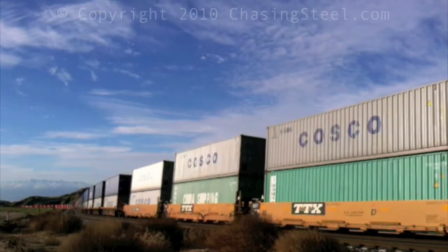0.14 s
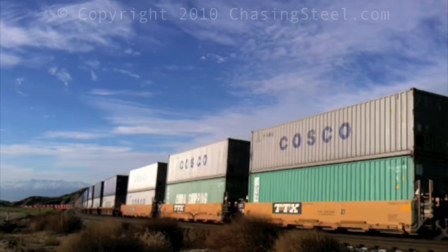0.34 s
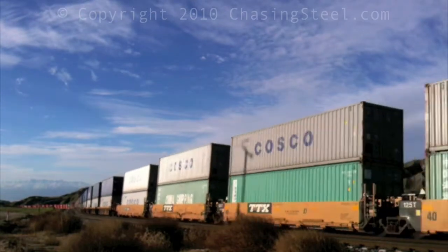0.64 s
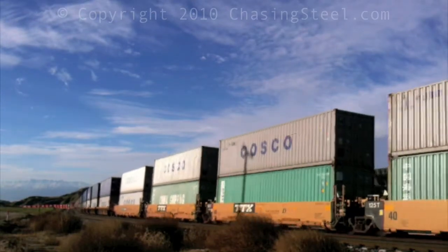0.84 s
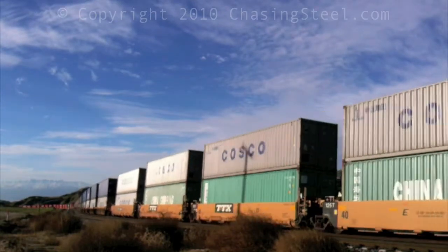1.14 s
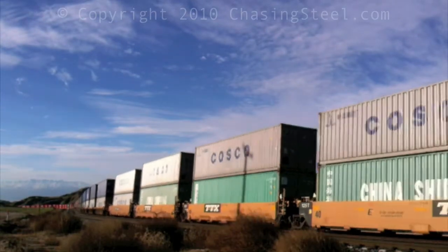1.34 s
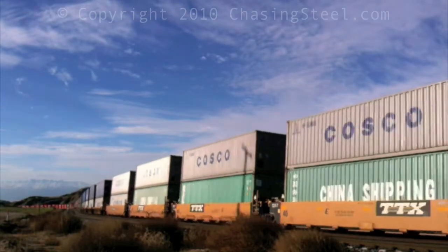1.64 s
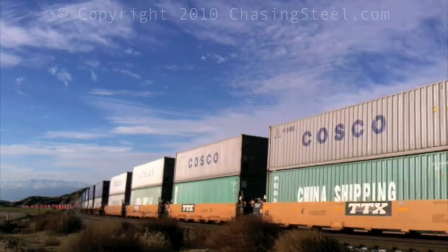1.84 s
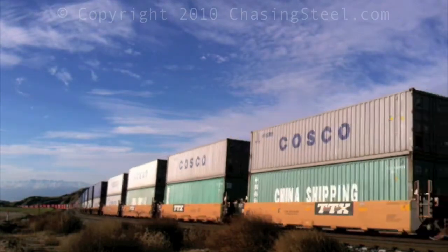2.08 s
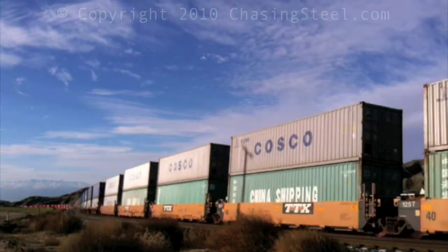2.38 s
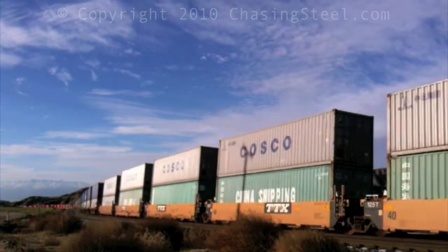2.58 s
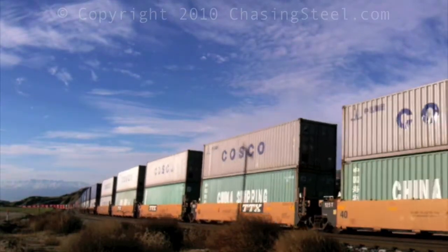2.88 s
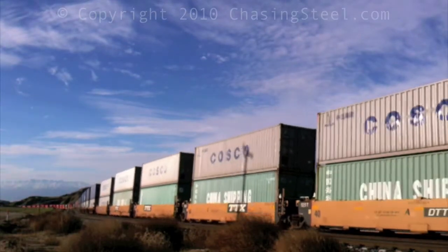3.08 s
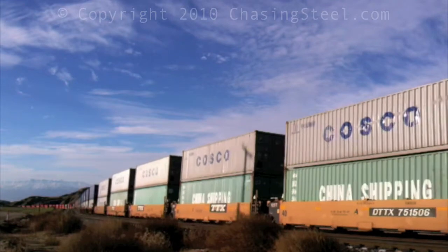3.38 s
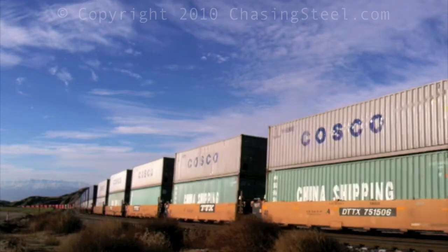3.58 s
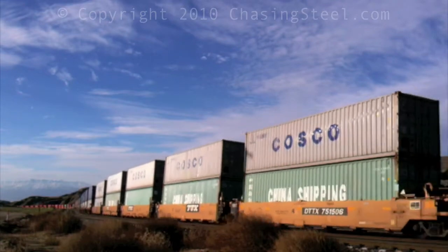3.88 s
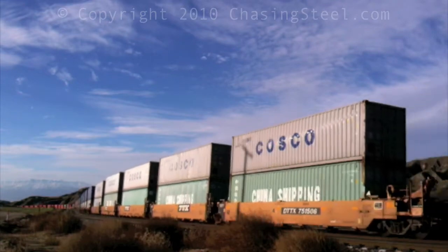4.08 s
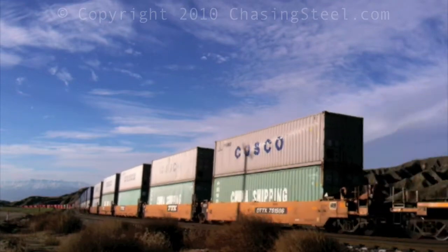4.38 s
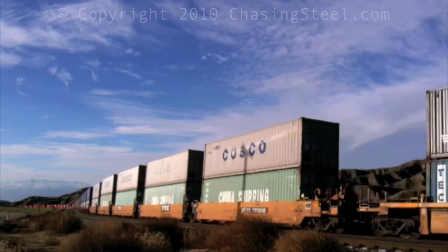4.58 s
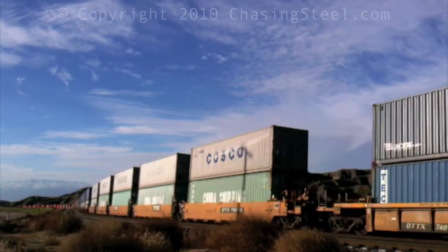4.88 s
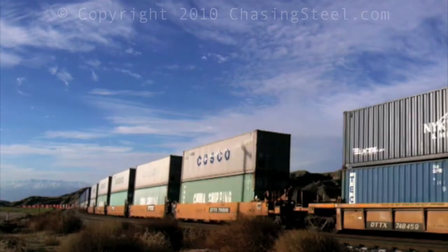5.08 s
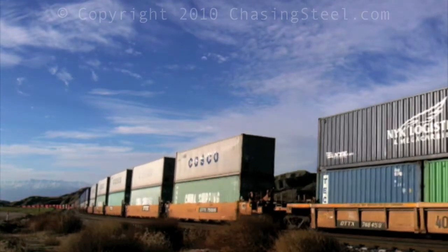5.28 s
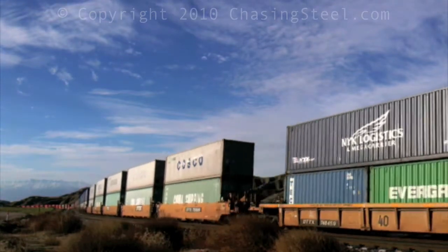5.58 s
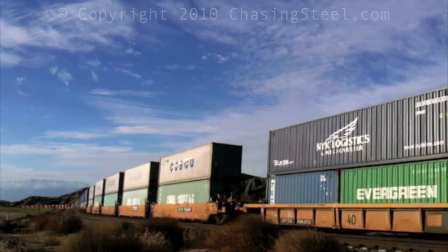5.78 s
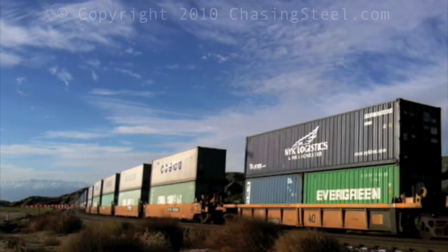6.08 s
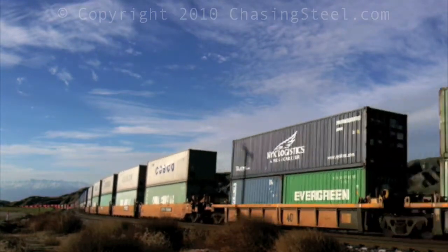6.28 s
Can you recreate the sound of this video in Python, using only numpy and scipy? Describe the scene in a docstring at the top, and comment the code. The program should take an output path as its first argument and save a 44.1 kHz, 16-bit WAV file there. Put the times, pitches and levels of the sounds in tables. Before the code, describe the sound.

Beside an open-air track, a loaded container train is already rolling past at 0 s and continues to the end at about 6.4 s. A steady deep rumble with a soft hollow boom and a grainy rail roar swells only slightly. From 0 to 2 s, a wheel squeaks with short, thin, fluttering upward whistles, roughly every 0.3 s, over faint scraping and distant very high whines. The squeaks space out and weaken until about 3.7 s. Meanwhile another wheel's pulsing scrape grows, with brief ringing metal notes from about 2 s and a very high squeal creeping in. From 3.7 to 5.1 s it is closest: sharp, piercing bursts, bright ringing and harsh rubbing, strongest near 4.5 to 4.7 s. Afterwards the pitches sit lower, and scraping, scattered pings and wavering squeals continue more weakly over the rumble. The microphone stays fixed, central and fairly close.

```python
"""A steady rumble and the scrape of a wheel open the scene: a freight train rolls past the track side. Shaped
noise makes the rumble, the boom and the roar of the rails. One wheel scrapes the rail once a turn: noise rings
in its modes, some sing out as clean tones, and a very high tone squeals, faintly at first. All these sink in
pitch as it passes. Another wheel, earlier in the train, squeaks about once a turn; wheels further off whine
faintly."""
import sys
import numpy as np
from scipy import signal
from scipy.io import wavfile
from scipy.ndimage import uniform_filter1d

SR = 44100
rng = np.random.default_rng(int(sys.argv[2]) if len(sys.argv) > 2 else 0)


def transcribe(u):
    """Save the signal u as a 16-bit wav file named by the first command-line argument.

    u: samples, shape (n,) or (channels, n), limited to [-1, 1]; the rate is SR.
    q: integer samples, one column per channel.
    """
    v = np.clip(np.atleast_2d(u).T, -1, 1)
    q = np.round(v * 32767).astype(np.int16)
    wavfile.write(sys.argv[1], SR, q)


N = 283563  # length of the scene in samples


def gain_of(db):
    """Turn decibels into a plain multiplier."""
    return 10 ** (np.asarray(db) / 20)


def evened(x):
    """Scale a signal to an rms of 1."""
    return x / np.sqrt(np.mean(x ** 2) + 1e-20)


def read(points, hz):
    """Read a curve of values against frequency, joined by straight lines on a log scale."""
    f, value = np.transpose(points)
    return np.interp(np.log(hz + 1), np.log(f + 1), value)


def follow(rows, t):
    """Read every column of a table at the times t; its first column is seconds."""
    s, *columns = np.transpose(rows)
    return [np.interp(t, s, c) for c in columns]


def add(mix, s, sound):
    """Mix in a sound that starts at s seconds."""
    part = mix[round(s * SR):][:len(sound)]
    part += sound[:len(part)]


def wander(count, size):
    """Smooth chance of rms 1, changing over about size samples."""
    smooth = uniform_filter1d(rng.standard_normal(count), size)
    return evened(uniform_filter1d(smooth, size))


def noise(power, patchy_db, size):
    """Random short-time spectra; power(hz, t) is the field, broken by drifting patches."""
    hop = size // 4
    hz = np.fft.rfftfreq(size, 1 / SR)[:, None]
    t = np.arange(N // hop + 5) * hop / SR
    a, b, patches = rng.standard_normal((len(t), len(hz), 3)).T
    patches = uniform_filter1d(np.ascontiguousarray(patches), size=8, axis=0)  # across frequency
    patches = evened(uniform_filter1d(patches, size=12, axis=1))  # across time
    spectra = (a + 1j * b) * np.sqrt(power(hz, t)) * gain_of(patchy_db * patches)
    return signal.istft(spectra, nperseg=size, noverlap=size - hop)[1][:N]


def press(t, start, length, rise, fall):
    """A soft-edged window of height 1: comes on at start, lets go after length."""
    coming_on = 1 + np.tanh((t - start) / rise)
    letting_go = 1 - np.tanh((t - start - length) / fall)
    return coming_on * letting_go / 4


SPEED, DISTANCE, NEAREST = 8.48, 12.5, 4.795  # m/s, m from the track, s when the wheel is closest


def doppler(t):
    """Pitch factor of the scraping wheel: above 1 as it comes, below 1 as it goes."""
    along = SPEED * (t - NEAREST)
    return 1 - SPEED / 343 * along / np.hypot(along, DISTANCE)  # 343 m/s is the speed of sound


# Flange against rail between the hard rubs: a light scrape that wavers and grows stronger
# as the wheel nears. Each row: time in seconds, scrape level in dB, treble tilt in dB.
LIGHT_CONTACT = [(0, -44.5, 3), (.27, -46.5, 1), (.85, -45, 0), (.97, -44.5, -14), (1.15, -48, -2),
                 (1.3, -46, -8.5), (1.5, -40, -8.5), (1.63, -45.5, -10.5), (1.66, -47, 1),
                 (1.7, -38.5, -0.5), (2.3, -40, 1), (3, -35.5, -1), (3.7, -36, 0.5), (3.9, -32, -0.5),
                 (4.55, -29, 1.5), (4.64, -34.5, 0), (4.72, -33.5, 3.5), (5, -31, 0.5), (5.5, -33, 0),
                 (5.65, -37.5, 2), (6.05, -37, 2), (6.43, -38.5, 6.5)]
# Hard rubs, about once a turn of the wheel and sometimes between.
# Each row: start in seconds, length in seconds, level in dB.
HARD_RUBS = [(.07, 0.15, -44.5), (0.373, 0.069, -42.5), (0.45, 0.12, -39.5), (0.69, 0.068, -40),
             (0.775, 0.15, -38.5), (1.025, 0.059, -38), (1.155, 0.1, -40), (1.388, 0.2, -47),
             (1.753, 0.089, -37.5), (1.84, 0.08, -37), (2.095, .15, -35.5), (2.313, 0.1, -34.5),
             (2.451, 0.077, -36), (2.77, 0.093, -33), (3.092, 0.1, -33.5), (3.318, 0.086, -34.5),
             (3.427, 0.096, -29.5), (3.792, 0.13, -32), (4.092, 0.17, -30.5), (4.41, 0.19, -29.5),
             (4.665, 0.051, -33), (4.757, .17, -26), (4.944, 0.058, -29), (5.017, 0.037, -29),
             (5.138, 0.076, -28.5), (5.254, 0.048, -31), (5.304, .13, -32.5), (5.492, 0.044, -29),
             (5.682, 0.061, -32.5), (5.783, 0.15, -28.5), (6.118, 0.18, -28.5)]
RUB_RISE_S, RUB_FALL_S = 0.014, 0.02
DULLING = 0.5  # the treble tilt drops this many dB for each dB of rub


def contact(t):
    """Level and treble tilt of the scrape: light contact plus the hard rubs."""
    light_db, treble_db = follow(LIGHT_CONTACT, t)
    hard = sum(gain_of(db) * press(t, s, length, RUB_RISE_S, RUB_FALL_S) for s, length, db in HARD_RUBS)
    rub_db = 10 * np.log10(gain_of(2 * light_db) + hard ** 2)
    return rub_db, treble_db - DULLING * (rub_db - light_db)


SCATTER_HZ = 8  # rms drift of a mode's pitch


def mode(hz, centre_hz, width, db):
    """Power of one mode, whose strength flickers and whose pitch shifts as the contact wanders."""
    strength = gain_of(2 * (db + 1.3 * wander(len(centre_hz), size=5)))
    away = hz - centre_hz - SCATTER_HZ * wander(len(centre_hz), size=3)
    return strength / (1 + (2 * away / width) ** 2) ** 0.96


# Broad part of the scrape.
# Each row: frequency in Hz, relative strength in dB per Hz.
HISS_CURVE = [(700, -9), (1500, -16), (2120, -6), (2600, 2), (2860, -7), (3300, 1), (3560, -3), (3950, 0),
              (6000, 2), (9000, 4.5), (12000, -1), (12700, 8), (13100, -11), (14500, 0.5), (16000, -20)]
# Modes of the wheel at rest, the pitches it rings at.
# Each row: frequency in Hz, width in Hz, relative level in dB.
WHEEL_MODES = [(1513, 180, -22.5), (1897, 39, -17), (2296, 30, -18), (2454, 51, -17), (2973, 19, -14.5),
               (3120, 52, -16), (3739, 39, -12), (3860, 140, -19), (4030, 16, -13), (4390, 80, -16.5),
               (4596, 64, -12), (5426, 270, -17), (6295, 89, -12.5), (7116, 61, -7.5), (8010, 220, -12),
               (8670, 53, -14.5), (8860, 45, -10), (9410, 120, -16.5), (9850, 36, -12), (10250, 77, -18),
               (10630, 130, -15), (11240, 130, -24), (11550, 170, -16)]
# How far the modes are raised over the hiss.
# Each row: time in seconds, boost in dB.
RING_BOOST = [(0, 21), (1.6, 9), (1.8, 22), (3, 23.5), (4.5, 29.5), (6.43, 30)]
BAND_HZ = [3000, 4900]  # the scrape level is set in this band


def scrape():
    """Friction noise, broad and through the wheel's modes, whose share of the sound changes over time."""
    def power(hz, t):
        rub_db, bright_db = contact(t)
        tiny_lift_db = 0.029 * (rub_db - uniform_filter1d(rub_db, size=60))
        ring_db = follow(RING_BOOST, t)[0] + tiny_lift_db
        modes = sum(mode(hz, f * doppler(t), width, db) for f, width, db in WHEEL_MODES)
        field = gain_of(2 * read(HISS_CURVE, hz)) + gain_of(2 * ring_db) * modes
        in_band = (hz[:, 0] > BAND_HZ[0]) & (hz[:, 0] < BAND_HZ[1])
        field = field / uniform_filter1d(field[in_band].sum(0), size=3)  # even out the band level
        # the tilt starts at 4 kHz and reaches its full dB value at 10.4 kHz
        tilt_db = bright_db * np.clip(np.log2(hz / 4000 + 1e-9) / np.log2(2.6), 0, 1.3)
        return field * gain_of(2 * tilt_db)

    sound = noise(power, patchy_db=1.4, size=2048)
    band = signal.sosfilt(signal.butter(4, BAND_HZ, "band", fs=SR, output="sos"), sound)
    level_db = np.repeat(contact(np.arange(0, N, 32) / SR)[0], 32)[:N]  # worked out every 32 samples
    return gain_of(level_db) * sound / band.std()


# Moments when one mode sings out.
# Each row: middle in seconds, length in seconds, pitch at the middle in Hz, peak level in dB.
SINGING_MOMENTS = [(0.784, 0.11, 7140, -37), (1.878, 0.18, 3170, -33), (1.908, 0.1, 1990, -40),
                   (2.116, 0.1, 9800, -36), (2.382, 0.1, 8040, -23), (2.383, 0.09, 10136, -32),
                   (2.387, 0.054, 7030, -29), (2.108, 0.066, 1980, -36), (2.762, 0.15, 1940, -36.5),
                   (2.82, 0.13, 3900, -39), (2.819, 0.094, 8161, -30), (3.096, 0.16, 7240, -36),
                   (3.11, 0.074, 3870, -36), (3.16, .2, 3150, -39.5), (3.48, 0.055, 4170, -29),
                   (3.504, 0.047, 7300, -29), (3.835, 0.11, 7200, -28), (3.876, 0.064, 8000, -29),
                   (4.186, 0.037, 8882, -22), (4.231, 0.3, 7200, -26), (4.246, 0.089, 5512, -29),
                   (4.46, 0.26, 3770, -32), (4.45, 0.078, 2450, -32), (4.552, .12, 4610, -28),
                   (3.892, 0.13, 4600, -32), (4.15, 0.16, 3790, -33), (4.428, 0.045, 1985, -28.5),
                   (4.159, 0.19, 3110, -31), (4.487, 0.14, 6250, -29), (4.534, 0.14, 7186, -16.5),
                   (4.68, 0.088, 3840, -34), (4.82, 0.13, 9776, -21), (4.806, 0.087, 3070, -28),
                   (4.821, 0.094, 8021, -27), (4.822, 0.066, 7062, -23), (4.855, 0.18, 8882, -24),
                   (4.86, 0.16, 4100, -24), (3.87, .12, 5500, -33), (4.861, 0.05, 5355, -28),
                   (4.88, 0.16, 3820, -29), (5.05, 0.07, 7080, -29), (5.063, 0.069, 9800, -25),
                   (5.219, 0.19, 7120, -30), (5.205, .06, 2280, -34), (5.294, 0.072, 2260, -32),
                   (5.3, 0.086, 8731, -29), (5.373, 0.084, 7140, -25), (5.385, 0.081, 7918, -28),
                   (5.513, 0.062, 7060, -26), (5.692, 0.076, 7080, -33), (5.85, 0.08, 7881, -23),
                   (6.02, 0.15, 6860, -35), (6.084, 0.085, 7760, -28), (5.542, 0.1, 3760, -33),
                   (5.072, .16, 3780, -33), (5.33, .2, 4500, -35), (6.13, .08, 4480, -34),
                   (6.203, 0.087, 3640, -33), (6.106, 0.065, 1890, -34), (6.152, .06, 3060, -31),
                   (6.254, 0.24, 3050, -37), (6.245, 0.062, 1910, -30), (6.312, .08, 1890, -30.5),
                   (6.24, 0.09, 7014, -27)]


def sings():
    """A mode locks into a clean tone that swells, sinks with the motion and dies."""
    out = np.zeros(N)
    for s, length, hz, db in SINGING_MOMENTS:
        t = s + np.arange(-length, length, 1 / SR)
        turns = np.cumsum(hz * doppler(t) / doppler(s)) / SR + rng.random()
        swell = np.exp(-.5 * ((t - s) / (0.28 * length)) ** 2)
        loose = np.clip((7000 - hz) / 3000, 0, 1)  # low modes lock less firmly and stay raspy
        rasp = 1 - .25 * loose + (.25 + .25 * loose) * wander(len(t), size=270)
        tone = np.sin(2 * np.pi * turns)
        add(out, t[0], np.sqrt(2) * gain_of(db) * swell * rasp * tone)
    return out


# The lasting part of the high squeal.
# Each row: time in seconds, level in dB.
LASTING_SQUEAL = [(2.0, -44), (2.22, -38), (3.1, -32.5), (3.8, -28.5), (4.2, -24), (4.55, -18), (4.8, -27),
                  (5.2, -20.5), (5.75, -27.5), (6, -23.5), (6.17, -29), (6.35, -36), (6.43, -28)]
# Bursts of the squeal as the flange bites.
# Each row: start in seconds, length in seconds, level in dB.
FLANGE_BITES = [(3.11, .03, -33), (3.556, .05, -30), (3.724, 0.037, -17), (3.902, 0.067, -18),
                (4.008, .11, -18), (4.21, 0.078, -27), (4.287, 0.032, -13), (4.357, 0.04, -23),
                (4.46, 0.023, -18), (4.504, 0.027, -11.5), (4.55, 0.027, -13), (4.589, 0.049, -13),
                (4.631, 0.055, -7.5), (4.715, 0.034, -19), (4.825, 0.013, -12), (4.885, 0.02, -26),
                (4.994, 0.039, -24), (5.072, 0.053, -13.5), (5.14, .07, -28), (5.236, 0.054, -17),
                (5.335, 0.042, -20), (5.43, 0.14, -27.5), (5.632, 0.04, -26), (5.7, 0.02, -17),
                (5.8, 0.055, -30), (6.044, .06, -29)]
BITE_RISE_S, BITE_FALL_S = 0.0091, 0.013
SQUEAL_HZ = 12486  # before the pitch factor of the passing wheel


def squeal():
    """A nearly pure tone with a fluttering level and a thin noisy skirt; bites add to its lasting level."""
    t = np.arange(N) / SR
    turns = np.cumsum(SQUEAL_HZ * doppler(t) + 4.6 * wander(N, size=500)) / SR
    flutter = gain_of(.8 * wander(N, size=400))
    skirt = .09 * wander(N, size=200)
    fade = np.clip((t - LASTING_SQUEAL[0][0]) / 0.23, 0, 1)
    lasting = fade * gain_of(follow(LASTING_SQUEAL, t)[0]) * (1 + 0.38 * wander(N, size=180))
    bites = sum(gain_of(db) * press(t, s, length, BITE_RISE_S, BITE_FALL_S)
                for s, length, db in FLANGE_BITES)
    return np.sqrt(2) * (lasting + bites) * (flutter + skirt) * np.sin(2 * np.pi * turns)


# Overtones of the squeak.
# Each row: multiple of the pitch, relative level in dB.
SQUEAK_OVERTONES = [(2, -1), (3, -6)]
SQUEAK_RISE_S, SQUEAK_FALL_S = 0.014, 0.024
SQUEAK_JITTER_HZ, OVERTONE_FUZZ = 13, .75  # rms wobble of pitch in Hz, of overtone phase in radians
SQUEAK_FLUTTER, SQUEAK_HAZE = .65, .22  # shares of the whistle once it has worked loose
OVERTONE_FADE_DB = 95  # per second, for each step up the series
HOARSE_PER_DB, CLEAR_DB = .045, -23  # haze added for each dB that a squeak lies below CLEAR_DB


def squeak(start, length, db, first_hz, climb, sag_db, overtones_db):
    """Stick and slip near one mode: a thin gliding, fluttering whistle whose overtones fade first."""
    t = np.arange(-.06, length + .12, 1 / SR)  # room for the soft edges
    held = np.clip(t, 0, length)
    level = gain_of(db + sag_db * held) * press(t, 0, length, SQUEAK_RISE_S, SQUEAK_FALL_S)
    turns = np.cumsum(first_hz + climb * held + SQUEAK_JITTER_HZ * wander(len(t), size=300)) / SR
    tone = np.sin(2 * np.pi * turns)
    for k, k_db in SQUEAK_OVERTONES:
        strength = gain_of(overtones_db + k_db - OVERTONE_FADE_DB * (k - 1.5) * held)
        fuzz = OVERTONE_FUZZ * wander(len(t), size=170)
        tone = tone + strength * np.sin(2 * np.pi * k * turns + fuzz)
    loose = np.clip(held / 0.039, .3, 1)  # clean as it grips, rougher as it goes on
    flutter = 1 + SQUEAK_FLUTTER * loose * wander(len(t), size=220)
    # a raspy band around the whistle, hoarser in weak squeaks
    hoarse = SQUEAK_HAZE * loose + HOARSE_PER_DB * max(CLEAR_DB - db, 0)
    haze = hoarse * wander(len(t), size=110) * np.cos(2 * np.pi * turns)
    sound = np.sqrt(2) * level * (flutter * tone + haze)
    return max(start + t[0], 0), sound[t + start >= 0]


# The squeaking wheel: about one long squeak a turn, some with a brief lead-in; early on, short ones between.
# Each row: start in seconds, length in seconds, level in dB, first pitch in Hz, climb in Hz per second,
# level change in dB per second (negative sags), level of the overtones in dB.
WHEEL_SQUEAKS = [(.01, 0.041, -39, 2590, -300, -40, -20), (0.118, 0.058, -36, 2540, 0, 0, -2),
                 (0.151, 0.11, -25, 2577, 856, -43, -13), (0.337, 0.065, -33.5, 2620, -900, -17, -16),
                 (0.452, .15, -33, 2560, 652, 14, -8), (0.673, 0.037, -34, 2590, -300, -42, -20),
                 (0.787, .034, -31.5, 2566, 0, 100, -15), (0.818, .12, -23.5, 2560, 796, -21, -12),
                 (1.01, 0.038, -34, 2610, -700, -60, -20), (1.137, 0.16, -21.5, 2518, 697, -95, -9.5),
                 (1.475, 0.13, -22.5, 2505, 793, -49, -10.5), (1.693, 0.059, -30.5, 2540, -300, -40, -20),
                 (1.838, .15, -27, 2486, 772, -87, -14), (2.053, 0.023, -29, 2590, -300, -40, -22),
                 (2.172, 0.15, -29, 2480, 694, -27, -16), (2.39, 0.11, -37, 2560, -500, -40, -20),
                 (2.539, 0.17, -27, 2485, 902, -93, -14), (2.878, 0.099, -31, 2490, 770, -70, -18),
                 (3.247, 0.1, -34, 2490, 770, -25, -16), (3.6, 0.11, -39, 2500, 500, -30, -16)]


def squeaks():
    """The other wheel's squeaks, each a short stick-and-slip whistle set at its own time."""
    out = np.zeros(N)
    for row in WHEEL_SQUEAKS:
        add(out, *squeak(*row))
    return out


# Faint fuzzy whines, one list for each whine: first the high squeal heard faintly early on, then the whine of
# wheels further off. Each row: time in seconds, pitch in Hz, level in dB.
FAINT_WHINES = [
    [(0, 12805, -53), (.5, 12800, -52), (1, 12795, -54), (1.1, 12790, -70)],
    [(0, 12570, -55), (.7, 12550, -49), (.9, 12540, -66), (1.7, 12590, -62), (2.2, 12590, -45),
     (3, 12520, -44), (4, 12470, -39), (4.6, 12480, -42), (5.3, 12530, -38), (6, 12435, -39),
     (6.43, 12420, -40)],
]


def whines():
    """Narrow bands of noise: a tone times slow chance."""
    out = np.zeros(N)
    for rows in FAINT_WHINES:
        t = np.arange(rows[0][0], rows[-1][0], 1 / SR)
        hz, db = follow(rows, t)
        tone = np.sin(2 * np.pi * np.cumsum(hz) / SR)
        add(out, t[0], np.sqrt(2) * gain_of(db) * wander(len(t), size=450) * tone)
    return out


# The train's mass rolling.
# Each row: time in seconds, then levels in dB of the rumble, the boom of the hollow cars, the rails' roar.
ROLLING_LEVELS = [(0, -31, -33, -37.5), (.25, -30.5, -35, -40), (.5, -30.5, -36.5, -36.5),
                  (1, -30.5, -40, -39), (1.5, -30, -40, -38.5), (2, -29.5, -39, -36),
                  (2.5, -29.5, -37.5, -37), (3, -28.5, -35.5, -35.5), (3.5, -28, -33, -34.5),
                  (3.9, -28, -35, -34.5), (4.2, -26.5, -30, -33), (4.5, -26.5, -35, -33.5),
                  (4.65, -27.5, -38, -35.5), (4.9, -27.5, -31, -34.5), (5.3, -27, -39, -34),
                  (5.7, -26, -34, -34.5), (6, -27, -44, -34.5), (6.43, -27, -32, -35)]
# Tone colour of the rumble and of the roar.
# Each row: frequency in Hz, relative strength in dB per Hz.
RUMBLE_CURVE = [(20, -56), (54, -53), (75, -14), (95, -9), (146, -1), (200, -2), (240, 2.5), (273, -2.5),
                (335, -2), (450, -10.5), (614, -20.5), (900, -29), (1500, -50)]
ROAR_CURVE = [(250, -32), (500, -11), (800, 2), (1200, 1), (1800, -2.5), (2800, -1), (3500, -8),
              (6000, -35), (15000, -44)]
BOOM_HZ, BOOM_WIDTH = 107.7, 12  # centre and width of the boom, Hz


def rolling():
    """Low rumble of cars and ground, one boomy resonance, and the roar of the rails above."""
    def boom_power(hz, t):
        return (1 + (2 * (hz - BOOM_HZ) / BOOM_WIDTH) ** 2) ** -2 + 0 * t

    rumble_db, boom_db, roar_db = follow(ROLLING_LEVELS, np.arange(N) / SR)
    # "+ 0 * t" repeats the same curve for every moment
    rumble = noise(lambda hz, t: gain_of(2 * read(RUMBLE_CURVE, hz)) + 0 * t, patchy_db=1.25, size=4096)
    boom = noise(boom_power, patchy_db=1.0, size=4096)
    roar = noise(lambda hz, t: gain_of(2 * read(ROAR_CURVE, hz)) + 0 * t, patchy_db=2.0, size=1024)
    low = gain_of(rumble_db) * evened(rumble) + gain_of(boom_db) * evened(boom)
    return low + gain_of(roar_db) * evened(roar)


def scene():
    """Add all the sources together, the same on both channels."""
    mix = scrape() + sings() + squeal() + squeaks() + whines() + rolling()
    return np.array([mix, mix])


EDGE_HZ = 15680  # upper edge of the sound


def record(dry):
    """One microphone on both channels, its loudest peaks softly rounded, then the band limit."""
    rounded = dry / (1 + np.abs(dry / .95) ** 6) ** (1 / 6)
    low_pass = signal.firwin(1023, EDGE_HZ, window=("kaiser", 9), fs=SR)
    return signal.oaconvolve(rounded, low_pass[None], "same")


dry = scene()
out = record(dry)
transcribe(out)
```